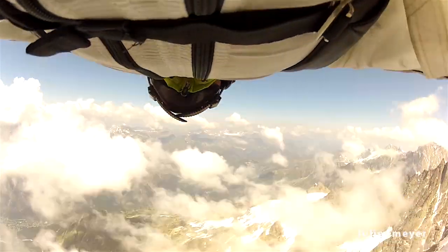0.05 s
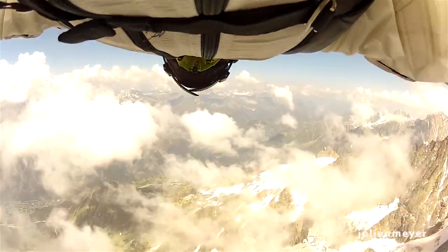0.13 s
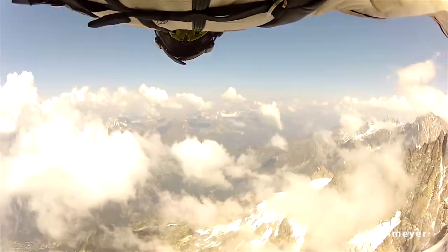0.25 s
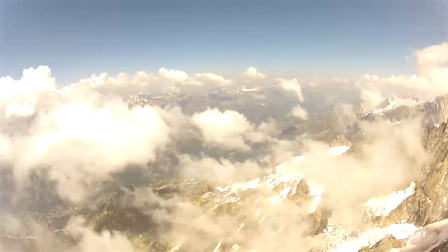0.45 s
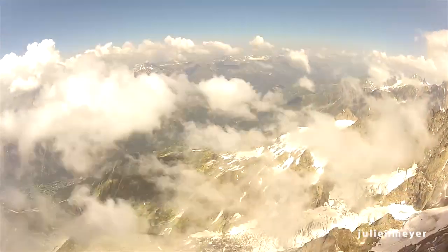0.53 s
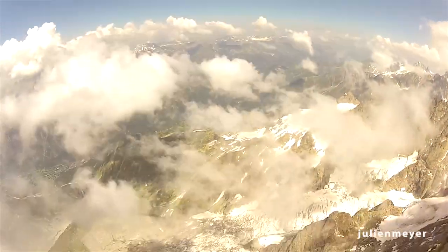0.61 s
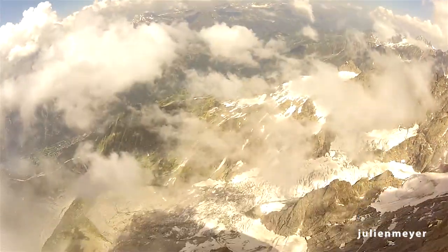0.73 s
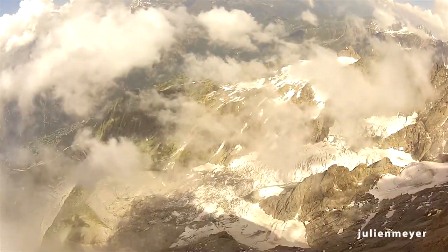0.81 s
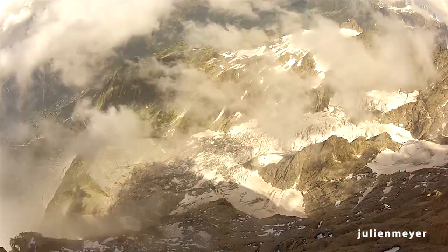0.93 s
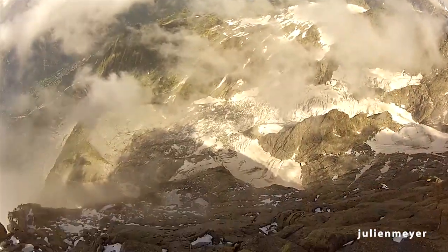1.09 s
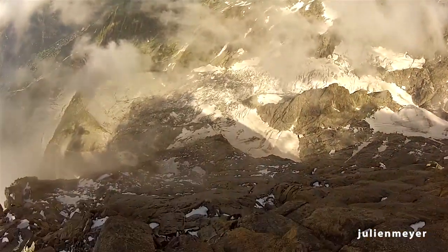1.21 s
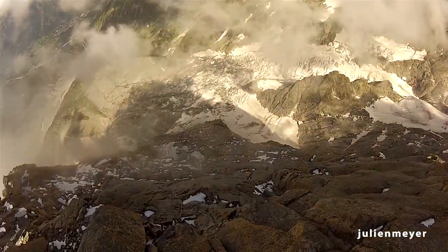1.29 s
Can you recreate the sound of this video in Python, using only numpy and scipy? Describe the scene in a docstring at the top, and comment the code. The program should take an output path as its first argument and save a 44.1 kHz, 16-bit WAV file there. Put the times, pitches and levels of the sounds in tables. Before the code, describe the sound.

Wind rushes over the microphone in uneven gusts, with a quick burst of flapping and thumps.

```python
"""In open air, on a fast glide: wind rushes over a small camera housing and buffets its microphone.
As the camera swings through the wake of the flyer's suit, fabric flaps, a few hard air blows thump the
housing and one snap rings its cavity; then the flow calms to a light flutter. Eddies blow brief hissy
whistles in the hollows and loose gear ticks. The recorder holds each sample at a low rate, which adds
a glassy fizz, and it clips."""
import sys
import numpy as np
from scipy.fft import rfft, irfft, next_fast_len
from scipy.io import wavfile
from scipy.ndimage import uniform_filter1d, map_coordinates

SR = 44100
rng = np.random.default_rng(int(sys.argv[2]) if len(sys.argv) > 2 else 0)


def store_wav(level_fs):
    """Save 16-bit WAV to argv[1]."""
    pcm = np.round(np.clip(np.atleast_2d(level_fs), -1, 1) * 32767)
    wavfile.write(sys.argv[1], SR, pcm.T.astype(np.int16))


N = 59535

# Fader rides for the wind. Each row: time in seconds, level in dB.
RUSH_LEVEL = [(0, -35.5), (.02, -43.5), (.055, -37), (.1, -35), (.125, -35), (.148, -43), (.17, -34.5),
              (.2, -26.5), (.228, -22.5), (.255, -26), (.29, -26), (.335, -27), (.365, -40), (.395, -43.5),
              (.42, -35.5), (.46, -39), (.525, -36), (.56, -40.5), (.6, -46.5), (.69, -52), (.77, -51.5),
              (.835, -42), (.9, -52.5), (.935, -49), (.98, -58.5), (1.02, -54.5), (1.06, -49.5),
              (1.115, -44.5), (1.16, -50.5), (1.35, -53)]
HEADWIND_LEVEL = [(1.05, -61.5), (1.17, -50), (1.27, -42), (1.35, -45)]  # the higher rush that sets in as the camera tilts down
BUFFET_LEVEL = [(0, -17.5), (.025, -38.5), (.09, -33), (.125, -26), (.15, -36.5), (.2, -33), (.235, -19.5),
                (.26, -22.5), (.33, -17.5), (.385, -36.5), (.44, -32), (.48, -31.5), (.52, -31.5),
                (.57, -33.5), (.64, -38), (.76, -38.5), (.83, -34), (.92, -37.5), (.98, -38.5), (1.1, -37),
                (1.2, -41), (1.26, -36), (1.35, -35)]
# Tone colours of the noises. Each row: frequency in Hz, level in dB.
RUSH_EQ = [(100, 0.5), (250, -16), (430, -26.5), (590, -1), (760, -17.5), (920, -4), (1050, -12.5),
           (1250, 2.5), (1420, -8), (1750, 2), (2200, -2.5), (2700, -18), (3100, -13), (3300, -21),
           (3550, -8.5), (4050, -25), (4500, -19.5), (5050, -30.5), (5400, -19.5), (5900, -34.5)]
HEADWIND_EQ = [(200, -42), (600, -11), (1000, -22), (1230, 4), (1450, -4.5), (1900, -8), (2250, 5.5),
               (2750, -6.5), (3120, -1), (3400, -14), (3850, -12), (4200, -20.5), (5900, -30)]
BUFFET_EQ = [(10, -28), (25, -3.5), (50, 1.5), (85, 0.5), (140, 0), (190, -12), (260, -16.5), (400, -28.5),
             (800, -30), (2000, -102)]
FLAP_BODY_EQ = [(200, -6), (600, -6.5), (900, -16), (1250, -1), (1700, 10), (2150, -4.5), (2700, -25),
                (3500, -43), (4500, -21), (5900, -51)]
CRACK_EQ = [(500, -40), (1700, -1), (3000, 12.5), (3700, 9), (4500, 1), (5300, 4.5), (5900, -14)]
FLAP_PUFF_EQ = [(60, 10.5), (150, 7), (250, 0), (420, -12), (620, 10.5), (850, -11.5), (1200, 6.5),
                (1700, -51), (3000, -30)]
TICK_EQ = [(1000, -40), (3200, -10), (4400, 1), (5200, 5.5), (5900, -18)]
# Eddies blowing across a hollow. Each row: peak time in seconds, half length in seconds, pitch in Hz,
# band width in Hz, level in dB.
WHISTLES = [(0.11, 0.016, 1290, 124, -31), (0.1, 0.018, 1805, 240, -28.5), (.226, 0.017, 2225, 150, -28.5),
            (0.517, 0.019, 1805, 140, -33.5), (1.299, 0.0026, 1250, 64, -33)]
# Flaps of the suit. Each row: start in seconds, level in dB, crack and low puff each in dB relative
# to the body, time to fade 60 dB in seconds.
FLAPS = [(0.217, -23.5, -16, -11, 0.029), (0.2204, -12, -15, -23, 0.029), (.2845, -15.5, -9.5, -9, 0.049),
         (.297, -20.5, -8, -16, 0.032), (0.3123, 0, -11, -18, 0.03), (0.3226, -12.5, -16, -8, 0.03),
         (0.3528, -24.5, -5.5, 7, 0.043), (0.518, -22, -39, -4, 0.026), (0.5319, -21, -2, -7, 0.02),
         (0.5399, -26, -4.5, -17, 0.028), (0.6138, -28.5, -8.5, -16, 0.021),
         (0.6562, -27.5, -9, -3.5, 0.0094), (0.6788, -34.5, -8, -12, 0.017),
         (0.7045, -34.5, -20, -6, 0.022), (0.8068, -34, -22, -1, 0.048), (0.8382, -36.5, -5.5, 1, 0.015),
         (0.8717, -31, -21, 1.5, 0.024), (1.0001, -32.5, -34, 0, 0.021), (1.031, -35, -31, 3, 0.026),
         (1.061, -33, -21, -6.5, 0.024), (1.0985, -35, -26, -0.5, 0.034), (1.1098, -32, -17, -14, 0.023),
         (1.138, -36.5, -20, -3, 0.025), (1.296, -33.5, -6, -7, 0.027)]
FLAP_ATTACK_S = 0.00064
# Air blows on the housing. Each row: start in seconds, level of the deep tone in dB, its pitch in Hz,
# its time to fade 60 dB in seconds, boxy overtone level in dB, hollow knock level in dB.
THUMPS = [(0.2708, -6.5, 85, 0.075, -18.5, -37.5), (0.2849, 3, 134, 0.028, -6, 2),
          (0.3062, -9, 106, 0.15, -7, -52), (0.3147, 7.5, 127.4, 0.041, -16, -11),
          (0.352, 3.5, 104.7, 0.057, -2.5, -8), (0.547, -18.5, 145, 0.071, -34, -23),
          (.566, -20, 135, 0.052, -37, -29), (1.002, -23.5, 134, 0.044, -59, -59),
          (1.038, -21, 85, 0.062, -42, -38)]
THUMP_ATTACK_S = 0.0015
BOX_HZ, BOX_T60_S = 235.7, 0.04
KNOCK_HZ, KNOCK_T60_S = 580, 0.022
# Modes of the air in the housing. Each row: pitch in Hz, level in dB relative to SNAP_RING_DB,
# time to fade 60 dB in seconds.
CAVITY_MODES = [(1275, -15, 0.03), (1980, -4.5, 0.023), (2245, 1.5, 0.024), (3350, -29, 0.03)]
SNAP_START_S, SNAP_RING_DB, SNAP_CRACK_DB, SNAP_CRACK_T60_S = 0.3424, -2.5, -21, 0.0074
# Ticks of loose gear. Each row: start in seconds, level in dB.
TICKS = [(0.5599, -31.5), (0.6653, -41), (0.669, -48), (0.674, -45), (0.735, -42.5), (0.7457, -47),
         (0.7829, -35.5), (.856, -45), (1.115, -48), (1.124, -53)]
HOLD_HZ, TOP_HZ, CLIP_DB = 12000, 15400, -0.5


def amp(db):
    """Decibels to gain."""
    return 10 ** (np.asarray(db) / 20)


def unit(x):
    """Scale to rms 1."""
    return x / np.sqrt(np.mean(x ** 2) + 1e-20)


def curve(rows):
    """(s, value) points as one value per sample."""
    return np.interp(np.arange(N) / SR, *np.transpose(rows))


def wobble(rate):
    """A smooth random curve, rate knots a second."""
    return map_coordinates(rng.standard_normal(2000), [np.arange(N) * rate / SR + 2], mode="wrap")


def filtered(x, response):
    """x times a response of frequency."""
    m = next_fast_len(N + SR // 4)
    return irfft(rfft(x, m) * response(np.fft.rfftfreq(m, 1 / SR)), m)[:N]


def noise(spectrum):
    """Noise of rms 1 with a (Hz, dB) spectrum."""
    f, db = np.transpose(spectrum)
    white = rng.standard_normal(N)
    return unit(filtered(white, lambda hz: amp(np.interp(np.log(hz + 1), np.log(f), db))))


def steadied(x, size):
    """Even out the chance swells of a noise over size samples."""
    return x / np.sqrt(np.abs(uniform_filter1d(x ** 2, size)) + 1e-9)


def since(start):
    """Seconds since start, zero before it."""
    return np.maximum(np.arange(N) / SR - start, 0)


def burst(start, attack, t60):
    """A quick rise and an exponential decay."""
    t = since(start)
    return (1 - np.exp(-t / attack)) * np.exp(-np.log(1000) * t / t60)


def ring(start, hz, attack, t60):
    """One damped mode."""
    return burst(start, attack, t60) * np.sin(2 * np.pi * hz * since(start))


def rush():
    """Turbulent air sounds the hollows of the housing, fluttering with the eddies."""
    side_db = curve(RUSH_LEVEL) + 1.25 * wobble(rate=59.85) + 2.14 * wobble(rate=350)
    side = amp(side_db) * steadied(noise(RUSH_EQ), size=900)
    headwind_db = curve(HEADWIND_LEVEL) + 2.2 * wobble(rate=200)
    return side + amp(headwind_db) * noise(HEADWIND_EQ)


def buffet():
    """Eddies push on the microphone itself: a low, lumpy rumble."""
    level_db = curve(BUFFET_LEVEL) + 1.6 * wobble(rate=55.42)
    return amp(level_db) * steadied(noise(BUFFET_EQ), size=2200)


def whistles():
    """Passing eddies blow single hollows into narrow, hissy tones that swell and fade."""
    t = np.arange(N) / SR
    sound = np.zeros(N)
    for peak, half_length, hz, width, db in WHISTLES:
        swell = np.exp(-0.5 * ((t - peak) / half_length) ** 2)
        hiss = filtered(rng.standard_normal(N), lambda f: 1 / (1 + ((f - hz) / width) ** 2) ** 2)
        sound += amp(db) * swell * steadied(hiss, size=500)
    return sound


def flaps():
    """Fabric flaps, heard through the housing: short bursts, each with its own blend of crack and puff."""
    body = steadied(noise(FLAP_BODY_EQ), size=130)
    crack = noise(CRACK_EQ)
    puff = steadied(noise(FLAP_PUFF_EQ), size=260)
    sound = np.zeros(N)
    for start, db, crack_db, puff_db, t60 in FLAPS:
        blend = body + amp(crack_db) * crack + amp(puff_db) * puff
        sound += amp(db) * burst(start, FLAP_ATTACK_S, t60) * blend
    return sound


def thumps():
    """Hard blows of air hit the housing: a deep, damped tone, a boxy overtone and a hollow knock."""
    sound = np.zeros(N)
    for start, db, hz, t60, box_db, knock_db in THUMPS:
        deep = amp(db) * ring(start, hz, THUMP_ATTACK_S, t60)
        box = amp(box_db) * ring(start, BOX_HZ, THUMP_ATTACK_S, BOX_T60_S)
        knock = amp(knock_db) * ring(start, KNOCK_HZ, THUMP_ATTACK_S, KNOCK_T60_S)
        sound += deep + box + knock
    return sound


def snap():
    """One sharp snap cracks and leaves the air in the housing ringing for a moment."""
    crack = burst(SNAP_START_S, FLAP_ATTACK_S, SNAP_CRACK_T60_S) * noise(CRACK_EQ)
    cavity = sum(amp(db) * ring(SNAP_START_S, hz, FLAP_ATTACK_S, t60) for hz, db, t60 in CAVITY_MODES)
    return amp(SNAP_CRACK_DB) * crack + amp(SNAP_RING_DB) * cavity


def gear_ticks():
    """Loose gear ticks lightly: tiny bursts of bright noise."""
    envelope = sum(amp(db) * burst(start, attack=0.00029, t60=0.0095) for start, db in TICKS)
    return envelope * noise(TICK_EQ)


def scene():
    """The wind bed and the hits on top of it, mixed in mono at the microphone."""
    wind = rush() + buffet() + whistles()
    hits = flaps() + thumps() + snap() + gear_ticks()
    return (wind + hits)[None]


def record(dry):
    """Sample-and-hold mirrors the sound into a glassy treble fizz; peaks clip; the very top is cut."""
    narrow = filtered(dry[0], lambda hz: hz < HOLD_HZ / 2 - 80)
    mirrored = narrow * (1 + 2 * np.cos(2 * np.pi * HOLD_HZ * np.arange(N) / SR))
    held = filtered(mirrored, lambda hz: np.sinc(hz / HOLD_HZ))  # holding softens the treble
    clipped = np.clip(held, -amp(CLIP_DB), amp(CLIP_DB))
    return filtered(clipped, lambda hz: hz < TOP_HZ)[None]


dry = scene()
out = record(dry)
store_wav(out)
```